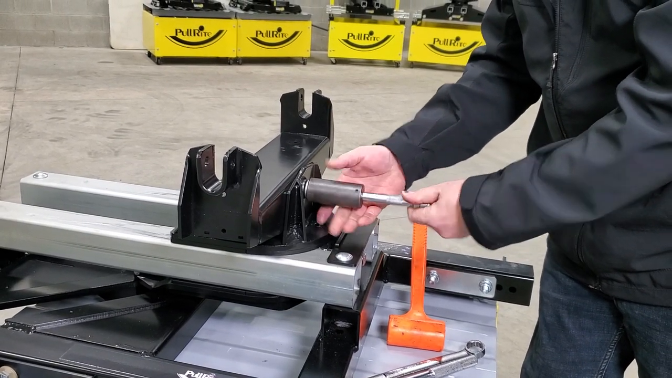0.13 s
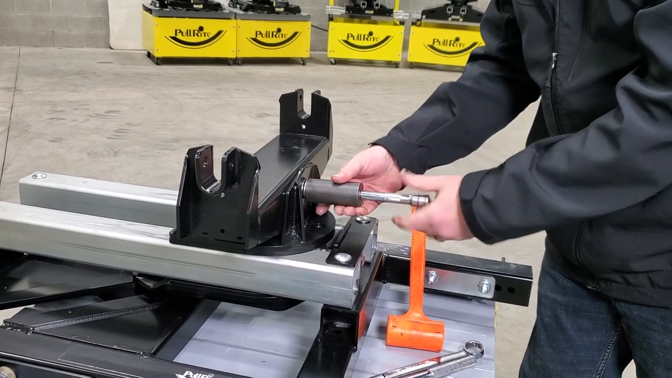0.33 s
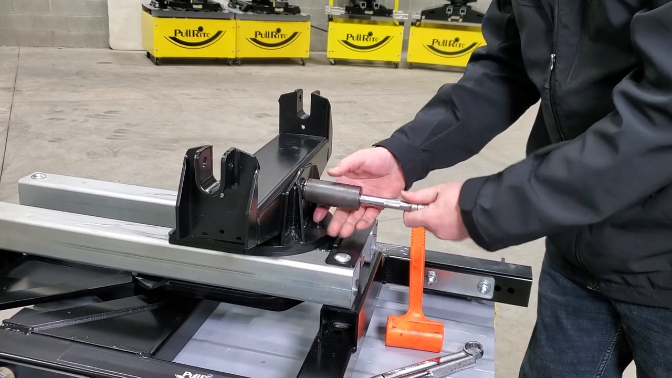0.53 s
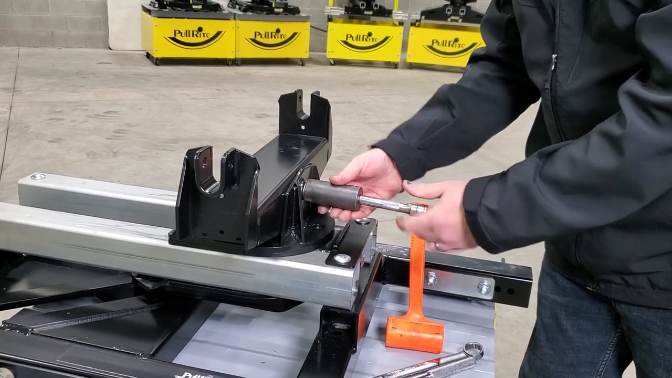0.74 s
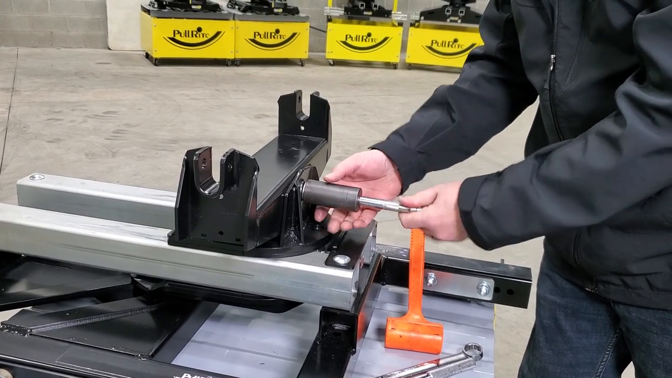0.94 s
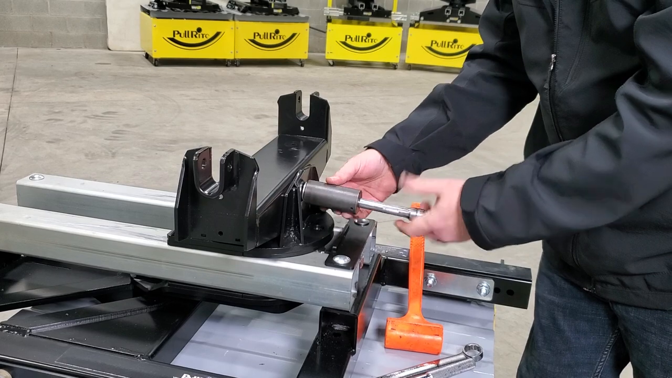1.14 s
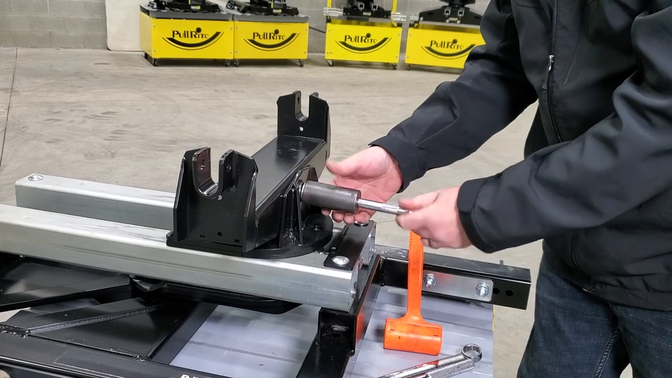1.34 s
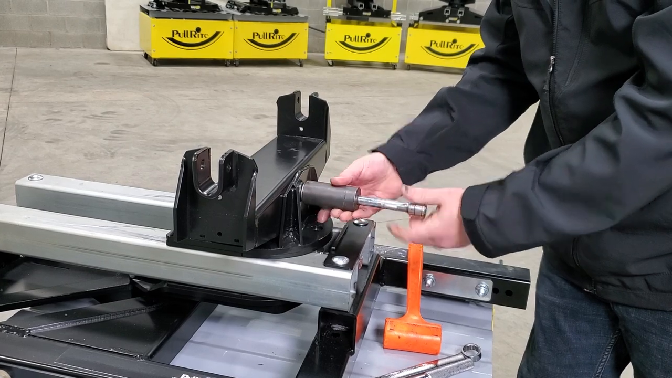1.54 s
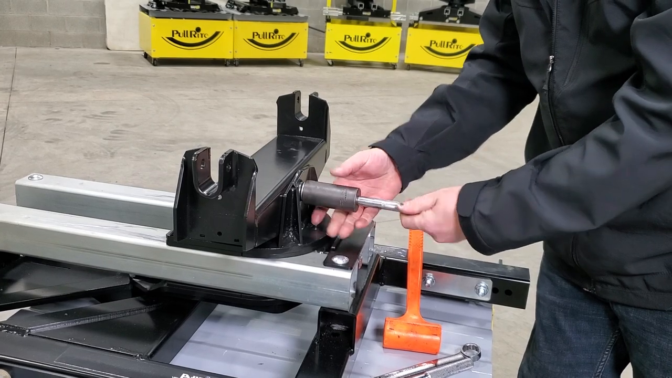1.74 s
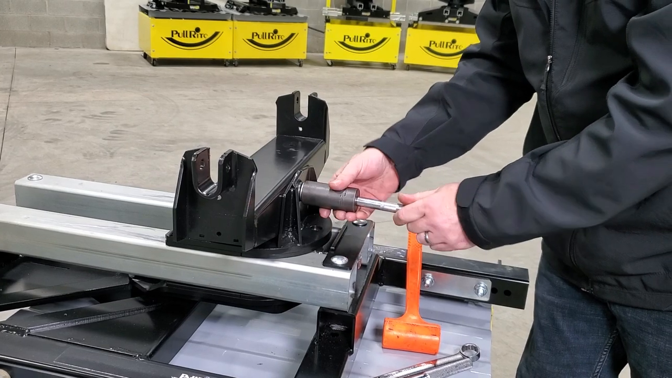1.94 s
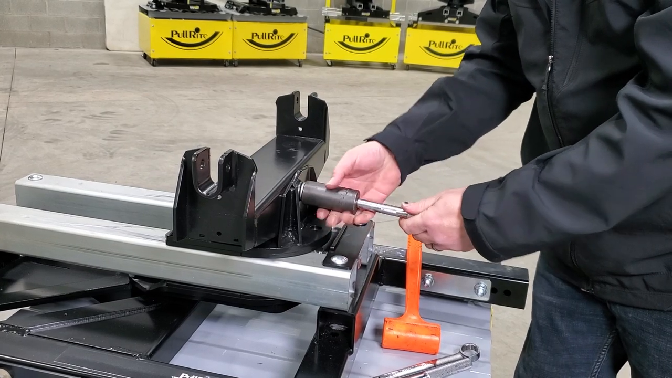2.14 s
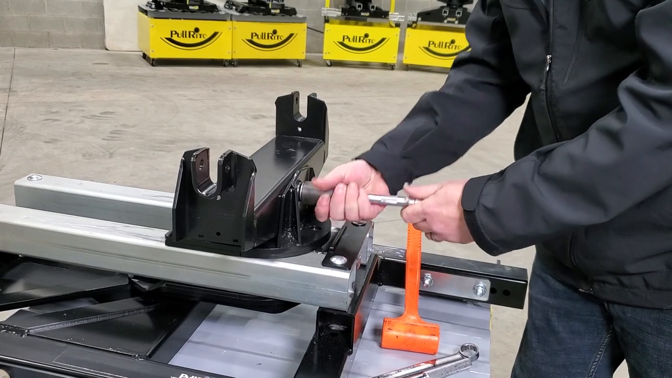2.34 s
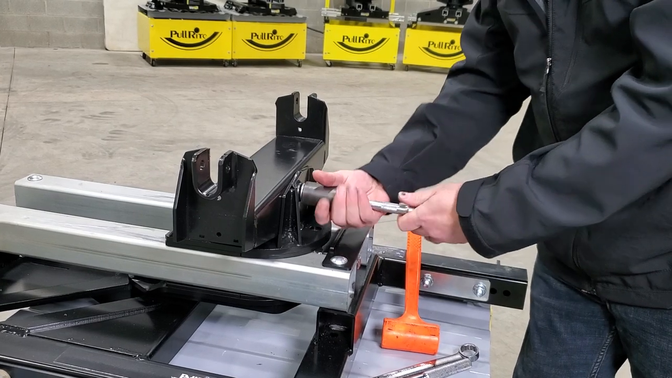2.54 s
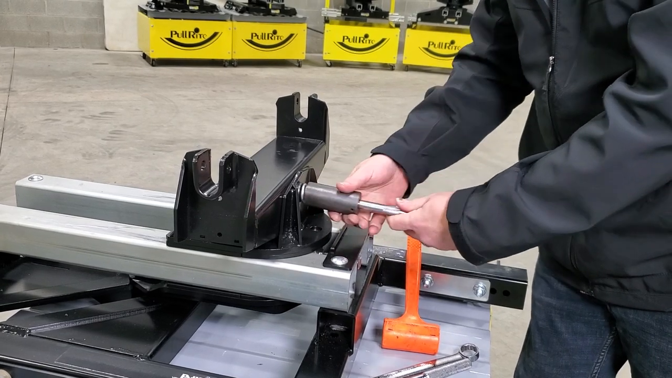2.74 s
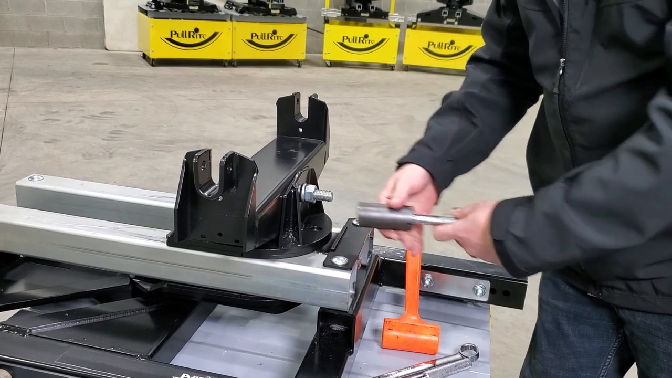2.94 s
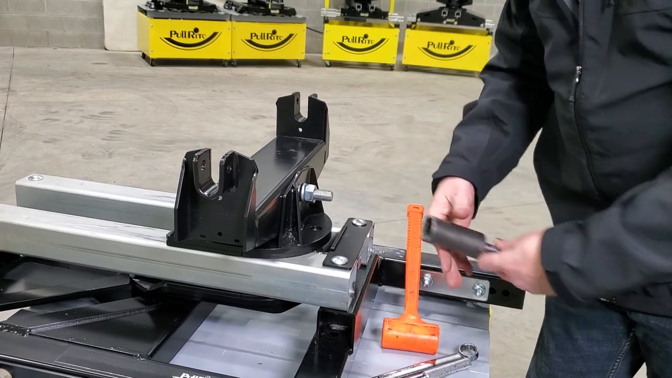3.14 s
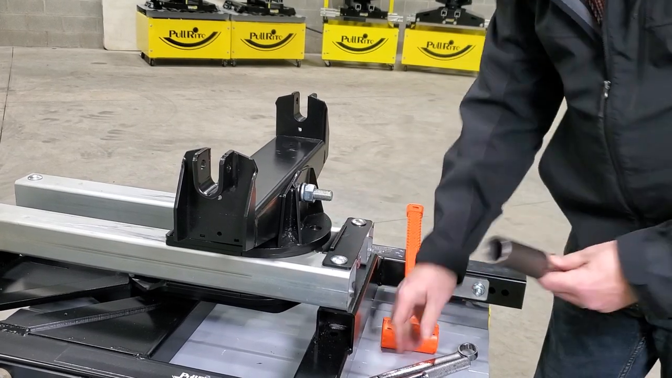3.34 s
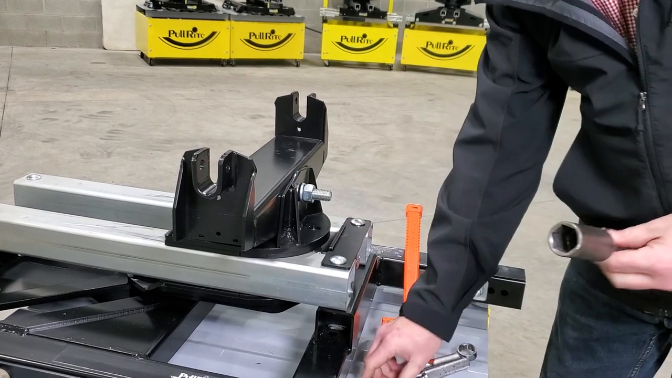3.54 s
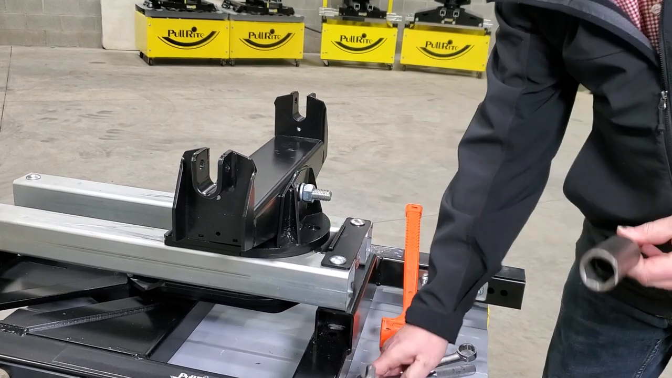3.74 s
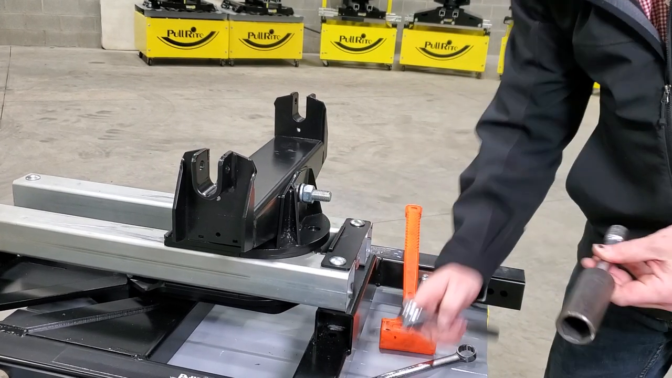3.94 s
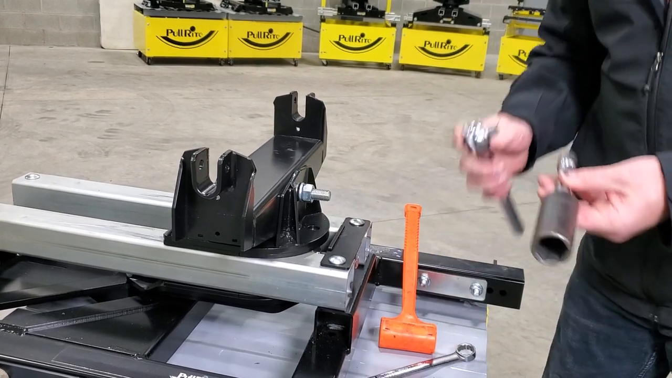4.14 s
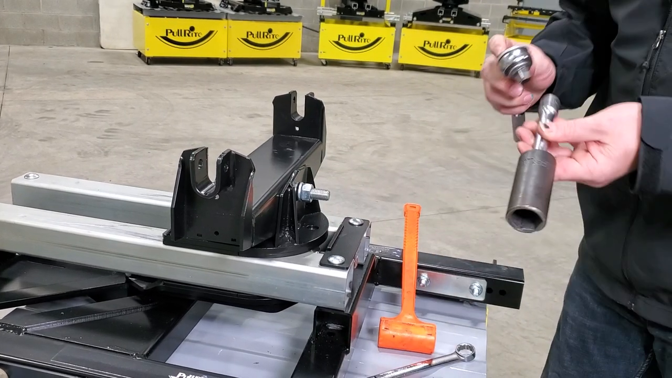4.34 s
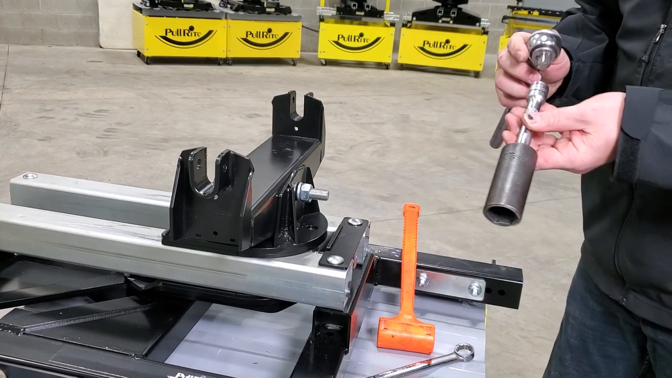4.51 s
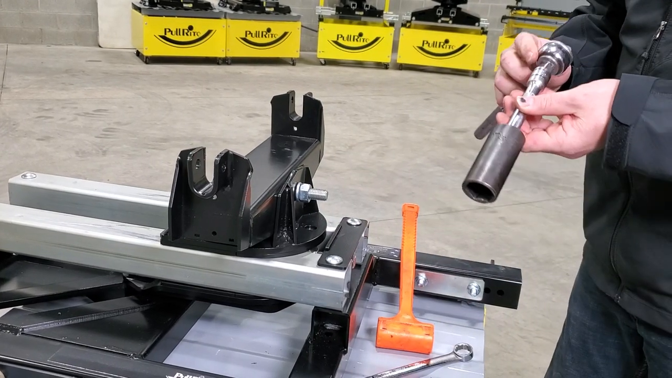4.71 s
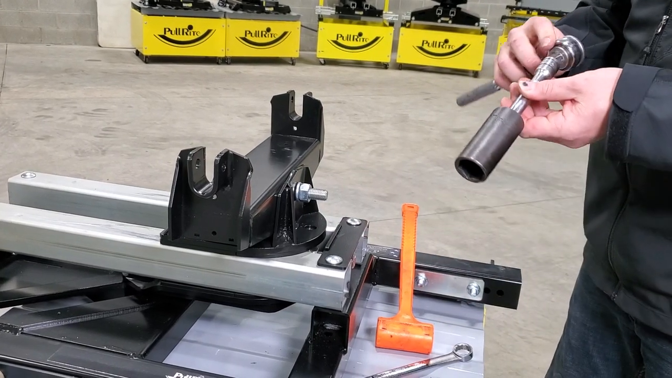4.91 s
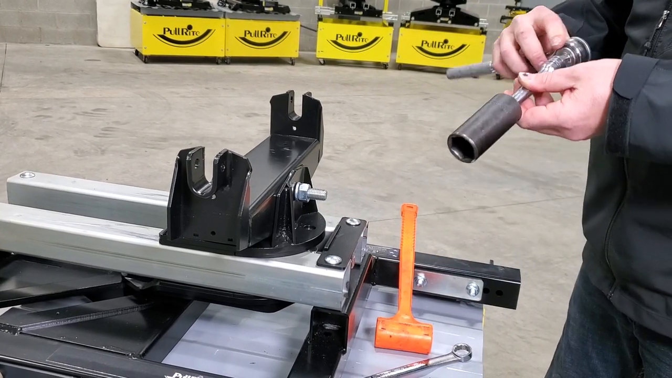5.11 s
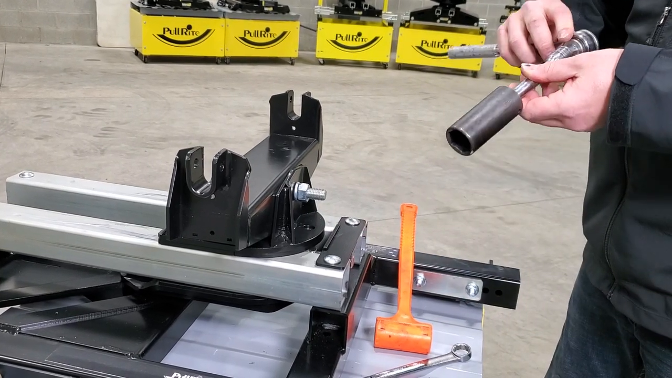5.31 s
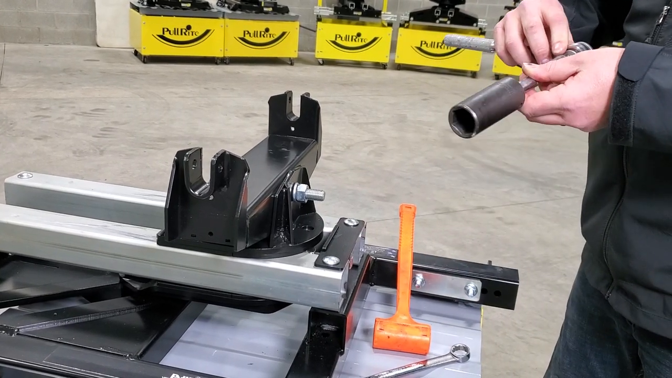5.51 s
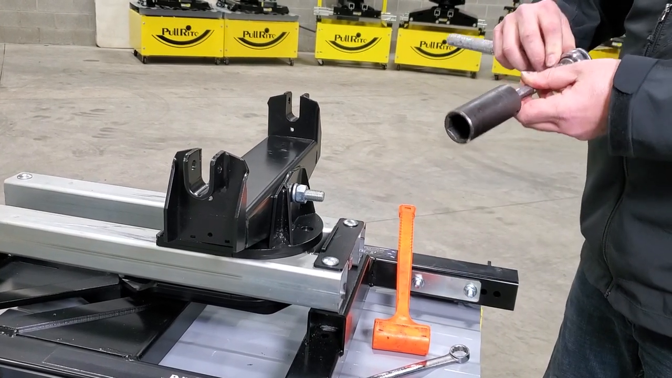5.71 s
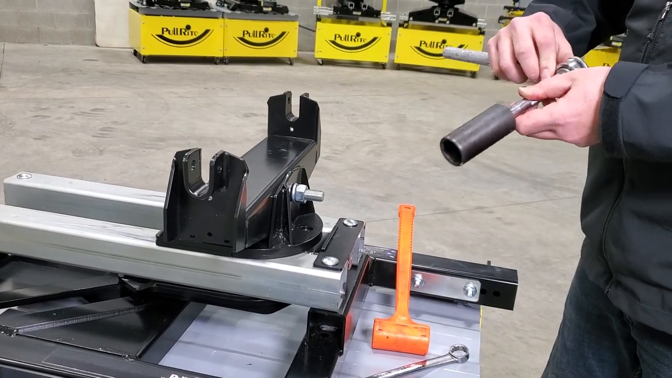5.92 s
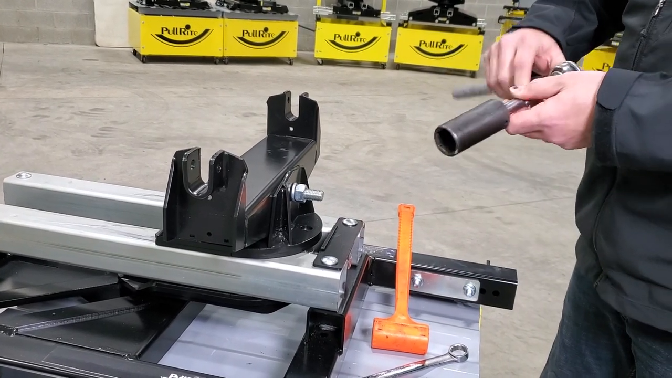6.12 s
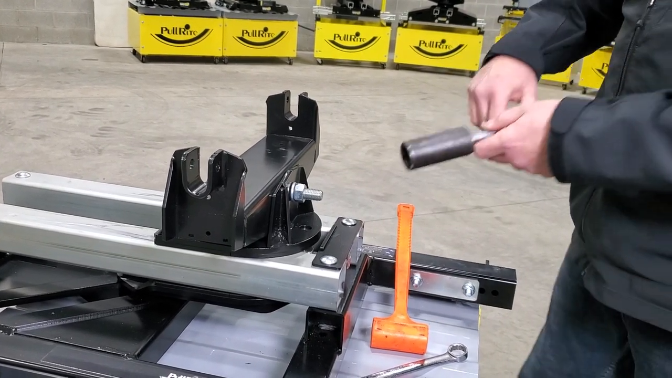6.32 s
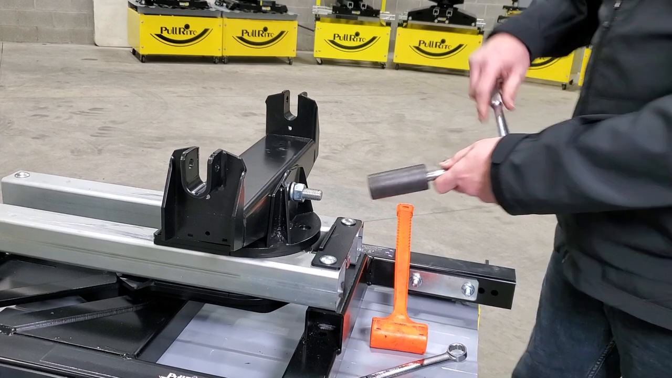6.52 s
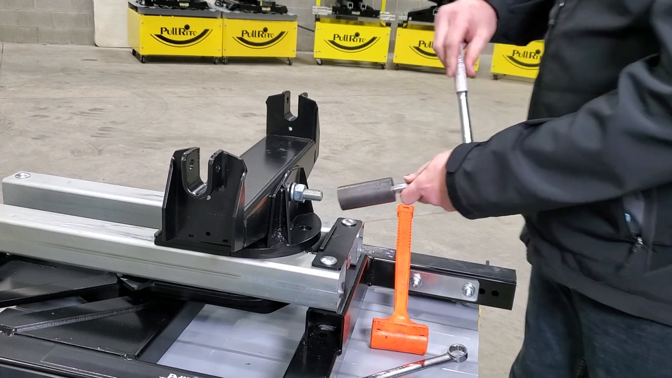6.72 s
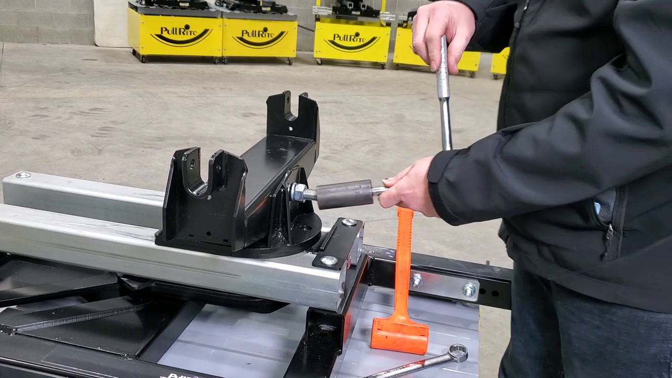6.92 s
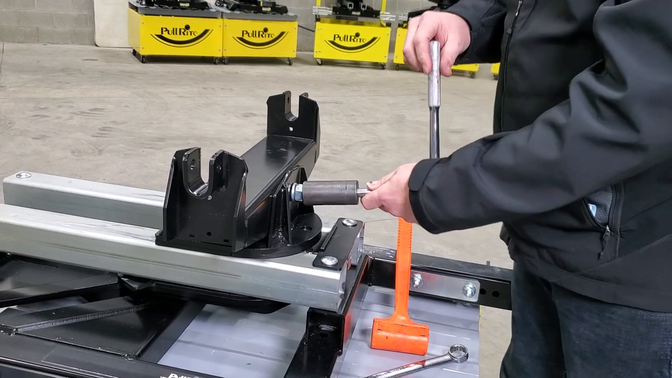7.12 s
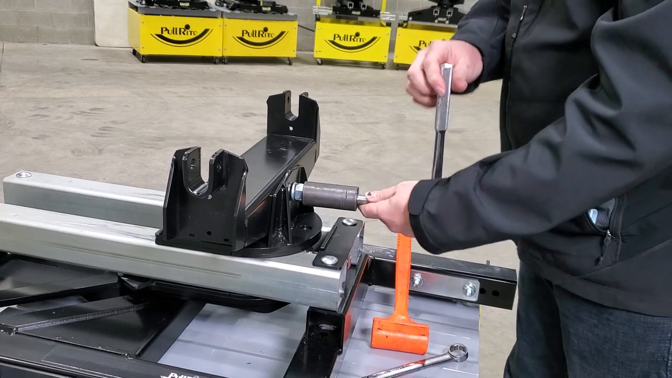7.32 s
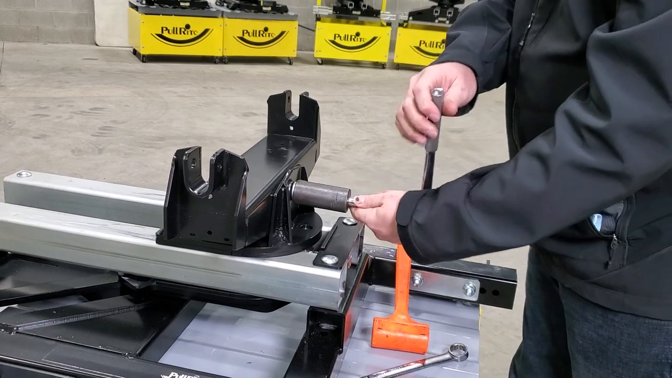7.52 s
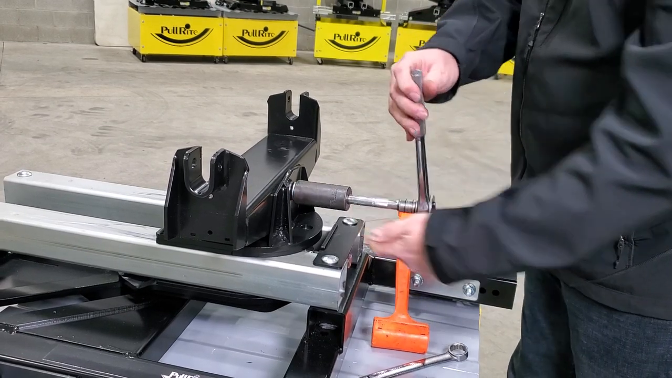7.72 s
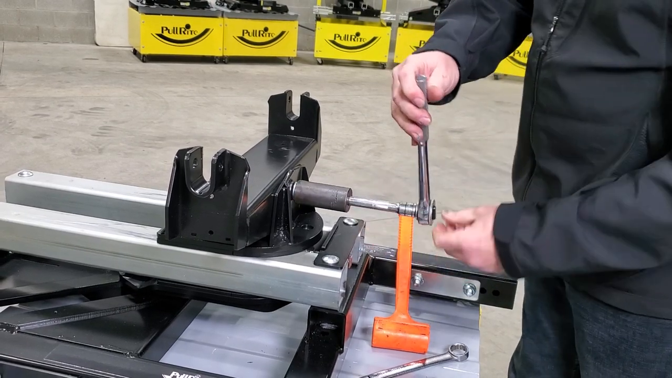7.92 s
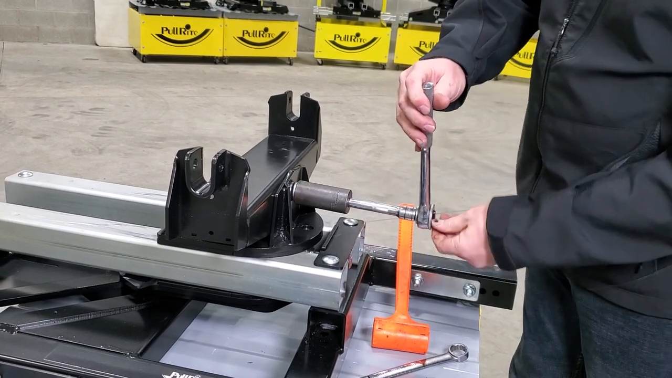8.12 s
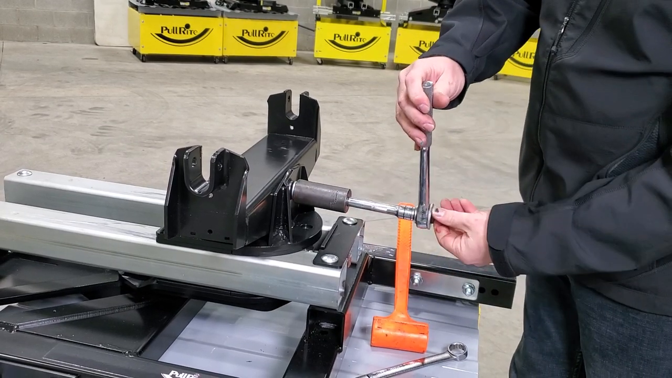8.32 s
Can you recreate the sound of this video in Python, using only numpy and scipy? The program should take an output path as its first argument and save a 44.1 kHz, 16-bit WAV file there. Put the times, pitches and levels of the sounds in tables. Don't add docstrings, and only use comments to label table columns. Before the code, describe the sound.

Near stereo microphone, work slightly to the left: quick uneven steel ticks and gritty grinding, a pull-off clank, a short pause, then the loudest heavy clank with a brief low hum. Quiet dry clicks and sleeve rustle follow, a bright snap, a pause, and a cluster of seating knocks and scrapes fading to little. Short diffuse hall reverberation, low rumble and soft hiss remain.

```python
import sys
import numpy as np
from scipy import signal
from scipy.fft import rfft, irfft, next_fast_len
from scipy.io import wavfile

SR = 44100
rng = np.random.default_rng(int(sys.argv[2]) if len(sys.argv) > 2 else 0)


def ratio(d):
    e = np.asarray(d, float) / 20
    return 10 ** e


def master(y):
    cut = np.clip(np.atleast_2d(y).T, -1, 1)
    pcm = np.round(cut * 32767)
    wavfile.write(sys.argv[1], SR, pcm.astype(np.int16))


N = 368672

# start [s], level [dB].
SHOVES = [(0.363, -66), (0.732, -71), (1.134, -36.5), (1.32, -36.5), (1.556, -43.5), (1.707, -47),
          (2.697, -57), (2.758, -41), (3.382, -41), (3.452, -43), (3.635, -25.5), (6.466, -52),
          (6.912, -41.5), (7.009, -33), (7.282, -62), (7.415, -32), (7.64, -42)]


def at_hz(points, hz):
    table_hz, value = np.transpose(points)
    return np.interp(np.log(hz), np.log(table_hz), value)


def rms_one(x):
    return x / np.sqrt(np.mean(x ** 2) + 1e-20)


def drift(rate_hz):
    r = np.exp(-80 * np.pi * rate_hz / SR)
    slow = signal.lfilter([1], [1, -2 * r, r * r], rng.standard_normal(N // 40 + 2002))
    slow = slow[2000:]
    return np.interp(np.arange(N) / 40, np.arange(len(slow)), rms_one(slow))


def convolve(x, response):
    return signal.fftconvolve(x, response, axes=-1)[..., :N]


def butter(x, order, hz, kind):
    return signal.sosfilt(signal.butter(order, hz, kind, fs=SR, output="sos"), x)


def resonance(x, hz, width_hz):
    r, turn = np.exp(-np.pi * width_hz / SR), 2 * np.pi * hz / SR
    return signal.lfilter(np.array([1, 0, -1]) * (1 - r * r) / 2, [1, -2 * r * np.cos(turn), r * r], x)


def modes(hz, level_db, t60, spread, scatter, size):
    t = np.arange(size)[:, None] / SR
    draw = rng.standard_normal((len(hz), 3))
    height = ratio(level_db + 1.5 * draw[:, 0]) * np.exp(-np.log(1000) * t / t60)
    phase = 2 * np.pi * hz * t + scatter * draw[:, 1]
    apart = spread * np.minimum(hz / 1500, 1) * draw[:, 2]
    return np.array([(height * np.sin(phase + side * apart)).sum(axis=1) for side in (1, -1)])


def banded_noise(spectrum, patchy_db, size=N, t60=None):
    # frequency [Hz], likeness [0..1].
    likeness = [(60, .99), (180, .97), (400, .85), (800, .5), (1650, .1), (15000, 0)]
    out, together = 0, drift(2.5)[:size]
    white = rng.standard_normal((2, 2, size))
    for k, low in enumerate(20 * 2 ** np.arange(0, 9.6, .5)):
        high = min(low * np.sqrt(2), 16400)
        hz = np.sqrt(low * high)
        if hz < spectrum[0][0] or low > spectrum[-1][0]:
            continue
        mid, side = butter(white[k % 2], 2, [low, high], "band")
        alike = np.clip(at_hz(likeness, hz), 0, 1)
        flicker_db = patchy_db * (.6 * together + drift(6.3)[:size])
        gain = ratio(at_hz(spectrum, hz) + flicker_db)
        if t60:
            gain = gain * ratio(-60 * np.arange(size) / SR / at_hz(t60, hz))
        out = out + gain * (np.sqrt(1 + alike) * mid + np.sqrt(1 - alike) * side * [[1], [-1]])
    return rms_one(out)


def grains(per_s, spread_db):
    sizes = ratio(spread_db * np.minimum(rng.exponential(1, N), 3)) * rng.choice([-1, 1], N)
    return rms_one(sizes * (rng.random(N) < per_s / SR))


def contacts(rows, treble_hz, chatter_db, crack_db, crack_t60, ring_db, ring_q):
    chatter, force, crack = grains(3000, 3.2), np.zeros((3, N)), np.zeros(N)
    for s, peak_db, bass_db, treble_db, hz, length_s in rows:
        at = round(s * SR)
        t = np.arange(min(SR // 3, N - at)) / SR
        span = slice(at, at + len(t))
        push = ratio(chatter_db) * chatter[span] * np.exp(-t / max(length_s, 5e-4))
        push *= 1 - np.exp(-t / 0.0011)
        push[0] += .6
        middle_db = min(9.5 * np.log2(hz / 1700), 0)
        tilt_db = np.array([[bass_db + 11.0], [middle_db], [treble_db + 15.5]])
        force[:, span] += ratio(peak_db + tilt_db) * push
        decay = ratio(peak_db + crack_db - t * 60 / crack_t60)
        crack[span] += decay * np.sin(2 * np.pi * hz * t) * (1 - np.exp(-t / 0.00073))
        crack[span] += ratio(peak_db + ring_db) * resonance(push, hz, hz / ring_q)
    bass = butter(force[0], 2, [420, 1400], "band")
    middle = butter(force[1], 4, [1400, treble_hz], "band")
    treble = butter(force[2], 2, 1.66 * treble_hz, "high")
    return bass + middle + treble, crack


def knock_rows():
    # start [s], peak [dB], treble re peak [dB], crack pitch [Hz], chatter length [s].
    spin_knocks = [(0.1, -34.5, 5, 3320, 0.015), (0.1194, -32.5, -18, 2070, 0.028),
                   (0.141, -38, -29, 2500, 0.017), (0.283, -34.5, -17.5, 920, 0.019),
                   (0.486, -37.5, -3, 2190, 0.034), (0.531, -33.5, -40, 2100, 0.012),
                   (0.543, -32.5, -20, 2500, 0.0078), (0.633, -29.5, -13, 1190, 0.0079),
                   (0.665, -35, -26, 2400, 0.031), (0.797, -35.5, -33, 1100, 0.034),
                   (0.821, -40, -10, 2130, 0.036), (0.891, -37.5, -12, 1530, 0.028),
                   (0.942, -33, -25, 717, 0.014), (0.966, -33, -24, 1490, 0.006),
                   (1, -41, -13, 2820, 0.0071), (1.065, -40.5, -28, 2070, 0.021),
                   (1.113, -39, -20, 2100, 0.089), (1.132, -38, -18, 974, 0.009),
                   (1.154, -32.5, -12, 2040, 0.0085), (1.231, -32.5, -19, 2440, 0.0088),
                   (1.261, -27, -11, 1510, 0.016), (1.313, -36.5, -6, 2280, 0.018),
                   (1.334, -32, -9, 2165, 0.011), (1.44, -49.5, -8, 2150, 0.019),
                   (1.55, -38, -24, 915, 0.054), (1.587, -34, -20, 1905, 0.015),
                   (2.047, -44, -15, 1528, 0.01), (2.154, -44, -24, 2662, 0.018),
                   (2.148, -32, -28, 1080, 0.015), (1.997, -54, -14, 1020, 0.015),
                   (2.431, -48, -24, 1100, 0.0073), (2.449, -39.5, -24.5, 2660, 0.02),
                   (2.499, -37.5, -27, 1130, 0.01), (2.534, -36.5, -26, 2650, 0.015),
                   (2.686, -43, -29, 1000, 0.01), (2.456, -40, -25, 1212, 0.011),
                   (2.478, -31.5, -33, 1140, 0.013), (2.533, -33, -32, 2058, 0.013),
                   (2.547, -31, -17.5, 974, 0.025)]
    pull_knocks = [(2.698, -36, -31, 1960, 0.015), (2.705, -28.5, -61, 2020, 0.012),
                   (2.7185, -28.5, -33, 1990, 0.017), (2.7524, -12, -12.5, 1556, 0.018),
                   (2.73, -27.5, -41.5, 1140, 0.015), (2.756, -21.5, -24, 2570, 0.015),
                   (2.779, -21.5, -24.5, 990, 0.008), (2.7684, -23.5, -22, 2010, 0.0043),
                   (2.791, -29.5, -23, 1000, 0.023), (2.8, -38, -43.5, 600, 0.065),
                   (3.3709, -43.5, -20, 1120, 0.0054), (3.385, -44.5, -23.5, 550, 0.033),
                   (3.411, -48.5, -18.5, 680, 0.082), (3.5, -51.5, -26, 567, 0.03),
                   (3.578, -54, -24.5, 930, 0.092), (3.447, -41.5, -23.5, 960, 0.037),
                   (3.631, -4, -11.5, 1216, 0.02), (3.6421, -12, -19, 1090, 0.0013),
                   (3.651, -11, -22, 1020, 0.016), (3.681, -16.5, -32, 980, 0.02),
                   (3.663, -13, -21, 1260, 0.02), (3.692, -14, -3.5, 2040, 0.0068),
                   (3.73, -22, -27, 2530, 0.052), (3.799, -46.5, -22.5, 2300, 0.017),
                   (3.881, -46.5, -32, 631, 0.036)]
    seat_knocks = [(6.4652, -42, -22, 1840, 0.0083), (6.8755, -26.5, -29, 1206, 0.033),
                   (6.883, -37, -20, 2740, 0.0052), (6.921, -23.5, -19, 1990, 0.0068),
                   (6.926, -18.5, -19, 970, 0.012), (6.932, -18.5, -14, 1930, 0.0069),
                   (6.94, -37, -11, 1930, 0.01), (6.962, -37, 9.5, 1980, 0.021),
                   (6.949, -14.5, -13, 1984, 0.0024), (6.9958, -18.5, 3.5, 1000, 0.004),
                   (7.002, -9.5, -29, 1304, 0.0061), (7.0125, -9.5, -11, 1520, 0.0062),
                   (6.999, -28, -20, 4230, 0.0089), (7.019, -27, -25, 1350, 0.014),
                   (7.034, -20, -14.5, 1105, 0.029), (7.296, -33.5, -25, 1120, 0.0052),
                   (7.304, -37, -18, 2000, 0.0042), (7.312, -31.5, -20, 1130, 0.0072),
                   (7.326, -37.5, -11, 1970, 0.014), (7.338, -32, -21, 2030, 0.0059),
                   (7.361, -35, -25, 1500, 0.0055), (7.489, -34.5, -17, 1520, 0.01),
                   (7.257, -40, -9, 1560, 0.023), (7.371, -36, -14, 1630, 0.018),
                   (7.346, -46, -13, 1060, 0.017), (7.4006, -21, -11, 1590, 0.014),
                   (7.415, -29.5, -10, 536, 0.035), (7.06, -26.5, -24, 620, 0.019),
                   (7.463, -39, -26, 1650, 0.034), (7.647, -42, -37, 940, 0.049)]
    return [(s, db, -10 - 0.16 * (db + 41.5), treble_db, hz, length_s)
            for s, db, treble_db, hz, length_s in spin_knocks + pull_knocks + seat_knocks]


def grinding():
    # time [s], level [dB].
    spells = [
        [(0.0, -47.5), (0.39, -47), (0.73, -43.5), (1.23, -46.5), (1.49, -47), (1.78, -107), (2.14, -48),
         (2.6, -49), (2.72, -41)],
        [(3.3, -58.5), (3.422, -85.5), (3.548, -58.5), (3.62, -52.5)],
        [(7.08, -35.5), (7.27, -56.5), (7.31, -54.5), (7.39, -40), (7.55, -48), (7.734, -68.5), (8.012, -57),
         (8.13, -58), (8.2, -102)],
    ]
    t, level = np.arange(N) / SR, np.zeros(N)
    for spell in spells:
        s, level_db = np.transpose(spell)
        level += np.interp(t, s, ratio(level_db - 38.0), left=0, right=0)
    return level * ratio(4 * drift(25)) * grains(1200, 4.0)


def frame():
    strong_hz = [590, 775, 974, 1130, 1198, 1296, 1560, 1735, 2063, 2123, 2410, 2670, 3450, 4500]
    # width [Hz], level [dB].
    strong_shape = [(60, 1.5), (40, -1.5), (35, 0), (35, 0), (30, -1), (24, -3), (40, 1), (35.3, 1),
                    (40, 4), (30, 0.5), (35, 1), (50, -0.5), (180, -14.5), (60, -9.5)]
    # frequency [Hz], level [dB per Hz].
    plate_levels = [(200, 6), (300, -17), (395, -22.5), (480, -26.5), (560, -9), (821, -12), (956, -2.5),
                    (1650, -3.5), (2060, 0), (2750, -9), (2950, -25.5), (3300, -15), (5900, -30.5),
                    (7000, -37.5), (9100, -64.5)]
    # frequency [Hz], t60 [s].
    plate_decay = [(150, 0.06), (480, 0.05), (650, 0.12), (2000, 0.12), (6000, 0.052)]
    edge_hz = 2850
    hz, (width_hz, level_db) = np.array(strong_hz), np.transpose(strong_shape)
    strong_t60 = np.log(1000) / np.pi / width_hz
    strong = modes(hz, level_db - 13.5, strong_t60, spread=1.0, scatter=0, size=SR // 5)
    hz = np.linspace(200, 7400, 260) + 6 * rng.standard_normal(260)
    thicket = modes(hz, at_hz(plate_levels, hz) - 7, at_hz(plate_decay, hz), spread=.9, scatter=.5, size=SR // 5)
    force, crack = contacts(knock_rows(), treble_hz=edge_hz, chatter_db=-18.5, crack_db=-1,
                            crack_t60=0.024, ring_db=27.5, ring_q=9.8)
    grind = grinding()
    dull = butter(grind, 6, edge_hz, "low")
    grind = dull + ratio(-9.5) * (grind - dull)
    body = convolve((ratio(-17.0) * force + grind)[None], strong + thicket) + stand(grind)
    bare_contact = butter(force, 4, 7000, "high")
    return body + crack + ratio(-31) * bare_contact


def stand(grind):
    # frequency [Hz], level [dB], t60 [s].
    sway_modes = [(162, 1.5, 0.089), (189.8, -1, 0.15), (391.6, -12, 0.32), (654, -21, 0.48)]
    hz, level_db, t60 = np.transpose(sway_modes)
    shoves = ratio(-2.5) * grind
    for s, shove_db in SHOVES:
        shoves[round(s * SR)] += ratio(shove_db)
    return convolve(shoves[None], modes(hz, level_db, t60, spread=0.33, scatter=0, size=SR // 2))


def click_rows():
    # start [s], peak [dB], treble re peak [dB], crack pitch [Hz].
    steel_clicks = [(0.01, -45, -30, 6850), (0.1, -26, 6.5, 2400), (0.11, -22, -8, 11850),
                    (0.84, -32.5, -24, 3500), (1.591, -33, -36, 3500), (0.4, -22, -18, 3570),
                    (0.67, -18.5, -14, 3450), (0.7884, -26, -15, 5260), (1.5482, -38, 0, 2400),
                    (0.4908, -44, -9, 10000), (1, -40, -16, 3600), (1.3, -43, -9, 8900),
                    (1.2306, -44, -19, 4200), (1.2616, -32, 2, 4900), (2.25, -35.5, -30, 3100),
                    (2.3339, -35, -25.5, 2400), (2.9, -41, 7.5, 1600), (0.68, -25.5, -20, 8700),
                    (0.6665, -52, -20, 6700), (2.75, -14.5, -20, 4100), (2.751, -6.5, -30.5, 2250),
                    (2.2, -42, -25, 3700),
                    (4.0255, -33, -8.5, 5520), (4.4, -49, -12, 3450), (4.5994, -22, -49, 3180),
                      (4.618, -39, -14, 2340), (4.622, -32, -7.5, 3110), (4.627, -28, -7, 3100),
                      (4.633, -41, -20, 3300), (4.8592, -57.5, 3, 3010), (4.9349, -29.5, -10, 3515),
                      (5.066, -50.5, -2, 3330), (5.091, -48.5, -15, 2340), (5.1875, -38.5, -33, 3160),
                      (5.23, -31, -21, 2510), (5.233, -37, -42, 1076), (4.602, -54, -30, 940),
                      (5.3505, -53, -7, 2540), (5.4992, -50.5, 7, 3330), (5.627, -51, -22.5, 6700),
                      (5.7078, -47.5, 1, 2620), (5.7385, -31, 5, 12500), (5.7402, -19.5, 1.5, 2270),
                      (5.7431, -9, -11, 6580), (5.749, -25, -6.5, 5660), (5.763, -21, -8, 6250),
                      (5.7665, -32, -18.5, 3330), (5.791, -38, -6, 2100), (5.812, -37.5, -22, 2890),
                      (5.8776, -48, 7, 5920), (6.0437, -35.5, -3, 3310), (6.0742, -50, -1, 2150),
                      (6.9236, -22.5, -26.5, 6020), (6.942, -17, -27, 6160), (6.957, -25, -22, 10100),
                      (4.9354, -37, -26, 7770), (5.2334, -37, -26, 7550), (5.275, -51, -25, 2500),
                      (5.31, -53.5, -25, 2450), (6.933, -28, -20, 6060), (6.951, -29, -22, 5600),
                      (7.006, -32, -21, 6300), (6.8775, -36.5, -26.5, 4660), (4.601, -32.5, -18, 8600),
                      (6.974, -20, -22.5, 5520), (6.997, -16.5, -14, 9980), (7.402, -25, -7, 3680)]
    return [(s, db, -26, treble_db, hz, 0.0021) for s, db, treble_db, hz in steel_clicks]


def tool():
    # frequency [Hz], level [dB per Hz].
    stubby_levels = [(410, -48), (700, -48), (1300, 14), (1460, -17.5), (1730, -20), (2530, -2), (3400, 14),
                     (4260, 14.5), (6480, 9), (9350, -11.5), (12500, -10.5), (16000, -56)]
    hz = np.linspace(700, 16300, 150) + 25 * rng.standard_normal(150)
    stubby = modes(hz, at_hz(stubby_levels, hz), .005 + 12 / hz, spread=.5, scatter=.3, size=SR // 20)
    force, crack = contacts(click_rows(), treble_hz=6500, chatter_db=-10.5, crack_db=2.0,
                            crack_t60=0.013, ring_db=15.5, ring_q=5.1)
    return convolve(ratio(-36.0) * force[None], stubby) + crack


def ringing(blows, ring_modes):
    strikes = np.zeros(N)
    for s, level_db in blows:
        strikes[round(s * SR)] = ratio(level_db)
    t = np.arange(SR) / SR
    ring = sum(ratio(level_db - 60 * t / t60) * np.sin(2 * np.pi * hz * t) for hz, level_db, t60 in ring_modes)
    return convolve(strikes, ring) * ratio(2 * drift(40))


def socket_tube():
    # start [s], level [dB].
    tube_blows = [
        (.483, -66),
        (2.733, -53),
        (2.751, -48),
        (4.621, -71),
        (5.741, -50),
        (5.763, -51),
        (6.957, -56),
        (6.996, -58),
    ]
    # frequency [Hz], level [dB], t60 [s].
    tube_modes = [(9954, 0, .48), (10000, -10, .25)]
    return ringing(tube_blows, tube_modes)


def rails():
    # start [s], level [dB].
    rail_blows = [
        (2.785, -37),
        (3.66, -35),
        (7.03, -43),
    ]
    # frequency [Hz], level [dB], t60 [s].
    rail_modes = [(581, 0, .73), (612, -8, .5), (646, -4, .57), (1066, -9, .5)]
    return ringing(rail_blows, rail_modes)


def gesture(start, hold, fade):
    attack_s = 0.015
    t = np.arange(N) / SR - start
    return np.clip(t / attack_s, 0, 1) * np.exp(-np.maximum(t - attack_s - hold, 0) / fade)


def jacket():
    # frequency [Hz], level [dB per Hz].
    cloth_colour = [(290, -39), (500, -17), (847, -3), (1240, -24.5), (1590, 3.5), (2940, -4),
                    (6760, -10.5), (8540, -25), (15100, -1.5), (15800, -4.5), (16500, -32)]
    # start [s], hold [s], fade [s], rustle [dB], airy top [dB].
    moves = [(0.0, 0.11, 0.059, -55.5, -76), (0.12, 0.3, 0.06, -72, -68), (0.47, 0.047, 0.021, -42, -66),
             (0.543, 0.45, 0.06, -68, -70), (1.08, 0.58, 0.046, -64, -71), (1.7, 0.32, 0.063, -75, -82),
             (6.458, 0.13, 0.06, -74, -99), (2.071, 0.24, 0.15, -50, -70.5),
             (2.528, 0.97, 0.052, -55, -71.5), (3.348, 0.22, 0.056, -67, -69.5),
             (3.84, 0.38, 0.095, -50, -70.5), (4.151, 0.12, 0.15, -69.5, -97),
             (4.614, 0.44, 0.17, -73, -90), (5.579, 0.13, 0.06, -60, -86),
             (5.704, 0.026, 0.037, -48.5, -60), (5.79, 0.65, 0.13, -54.5, -69),
             (7.046, 0.14, 0.17, -46.5, -57.5), (7.386, 0.37, 0.26, -53.5, -76),
             (7.742, 0.13, 0.11, -85, -82), (8.0, 0.084, 0.062, -55, -66.5)]
    # level [dB], frequency [Hz], width [Hz].
    drag_bands = [(-58, 3620, 270), (-61.5, 4030, 360), (-62.5, 2580, 600)]
    cloth = banded_noise(cloth_colour, patchy_db=1.5)
    rustle = rms_one(butter(cloth, 6, 7600, "low"))
    top = rms_one(butter(cloth, 6, 7600, "high"))
    envelopes = np.array([gesture(*move[:3]) for move in moves])
    rustle_gain, top_gain = ratio(np.transpose(moves)[3:]) @ envelopes
    white = rng.standard_normal((2, N))
    sleeve = 0
    for db, hz, width_hz in drag_bands:
        sung = resonance(resonance(white, hz, width_hz), hz, width_hz)
        sleeve = sleeve + ratio(db) * rms_one(sung)
    drag = gesture(4.136, 0.18, 0.17) * sleeve
    return ratio(-7.0) * rustle_gain * rustle + top_gain * top + drag


def ports(x, left_lead):
    # frequency [Hz], level [dB].
    left_over_right = [(120, -0.5), (300, 2.5), (600, 2.5), (1100, 7.5), (2000, 15.5), (4000, 11.5),
                       (8000, -1.5), (13000, 7.5)]
    size = next_fast_len(N + 4096)
    hz = np.maximum(np.arange(size // 2 + 1) * SR / size, 1)
    lead = np.interp(hz, *np.transpose(left_lead)) * np.minimum(hz / 800, 1)
    tilt = ratio(at_hz(left_over_right, hz) / 2) * np.exp(.5j * lead)
    return irfft(rfft(x, size) * np.array([tilt, 1 / tilt]), size)[:, :N]


def hall(x):
    # frequency [Hz], level [dB per Hz].
    tail_colour = [(60, 8.5), (600, 1), (1000, -4.5), (2500, -3), (5000, -1.5), (6500, -3), (9000, -0.5),
                   (16400, -5)]
    # frequency [Hz], t60 [s].
    tail_decay = [(120, 0.7), (400, 0.68), (700, 0.75), (1500, 0.62), (2500, 0.72), (4000, 0.72),
                  (6200, 0.75), (9000, 0.45), (15000, 0.35)]
    tail = banded_noise(tail_colour, patchy_db=.7, size=SR, t60=tail_decay)
    t = np.arange(SR) / SR
    onset = np.clip((t - .003) / 0.0014, 0, 1)
    early = 1 + ratio(9.5) * np.exp(-t / 0.022)
    return convolve(x.mean(axis=0)[None], tail * onset * early / np.sqrt(SR))


def rumble():
    # frequency [Hz], level [dB per Hz].
    rumble_colour = [(13, -59), (22, -13.5), (43, -8), (70, 4.5), (108, -3.5), (129, -11.5), (173, -6.5),
                     (216, -26), (370, -38), (600, -47.5), (780, -79.5), (1320, -120)]
    let_go_s = 4.3
    t = np.arange(N) / SR
    gain = ratio(-51.5) + ratio(-63) / (1 + np.exp((t - let_go_s) / 0.045))
    for s, db in SHOVES:
        gain = gain + ratio(db - 11) * (t > s) * np.exp(-np.maximum(t - s, 0) / 0.059)
    return ratio(3) * gain * banded_noise(rumble_colour, patchy_db=1.2)


def hiss():
    # frequency [Hz], level [dB per Hz].
    hiss_colour = [(240, -35), (400, -8), (529, -34), (734, -34.5), (1030, -11), (1750, -5.5),
                   (2510, -12.5), (5000, -14.5), (8190, -14.5), (15300, -31), (16500, -25.5)]
    return ratio(-72.5) * banded_noise(hiss_colour, patchy_db=.6)


def scene():
    # frequency [Hz], lead [radians].
    frame_lead = [(0, 1), (1200, 0.68), (2670, 1.5), (4650, 0.5), (6030, 5.5), (7490, -11), (9910, -17.5),
                  (10300, -13.5), (12800, -37), (16400, -23)]
    hand_lead = [(0, -2), (5250, -3.5), (9470, -20), (13200, -25), (15400, 2.5), (16400, 19.5)]
    fixed_steel = butter(frame(), 2, 110, "high")
    held_steel = tool()
    steel = ports(fixed_steel, frame_lead) + ports(held_steel, hand_lead)
    steel = steel + ratio(-10) * hall(fixed_steel + ratio(-6) * held_steel)
    steel = steel + ratio(-0.5) * resonance(steel, 15400, 1200)
    steel = steel - 0.7 * resonance(steel, 7900, 2400)
    air = hiss()
    return steel + socket_tube() + rails() + jacket() + rumble() + air


def low_pass(x):
    return signal.sosfilt(signal.butter(12, 16800, fs=SR, output="sos"), x)


def record(dry):
    rounded = .9 * np.tanh(dry / .9)
    steep_cut = signal.cheby2(12, 60, 16850, fs=SR, output="sos")
    mix = butter(signal.sosfilt(steep_cut, rounded), 10, 15900, "low")
    return low_pass(mix)


dry = scene()
out = record(dry)
master(out)
```